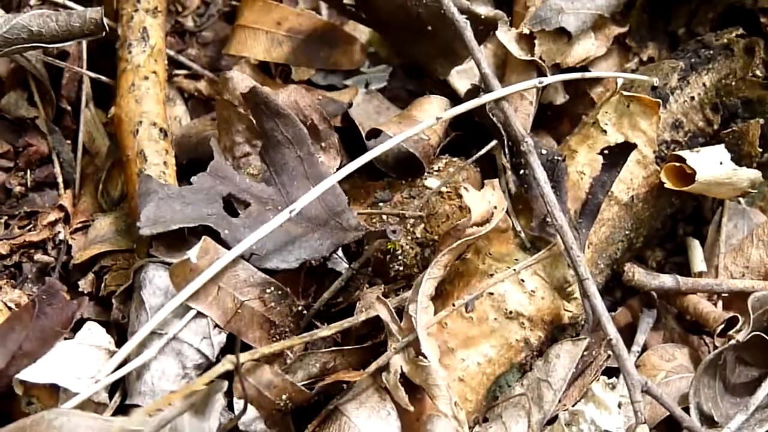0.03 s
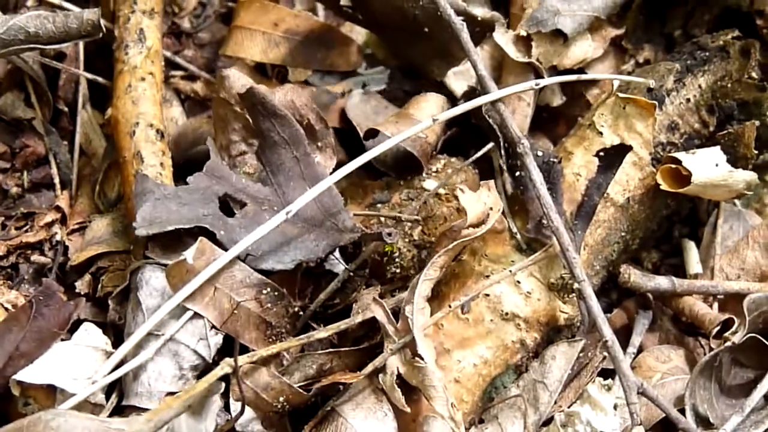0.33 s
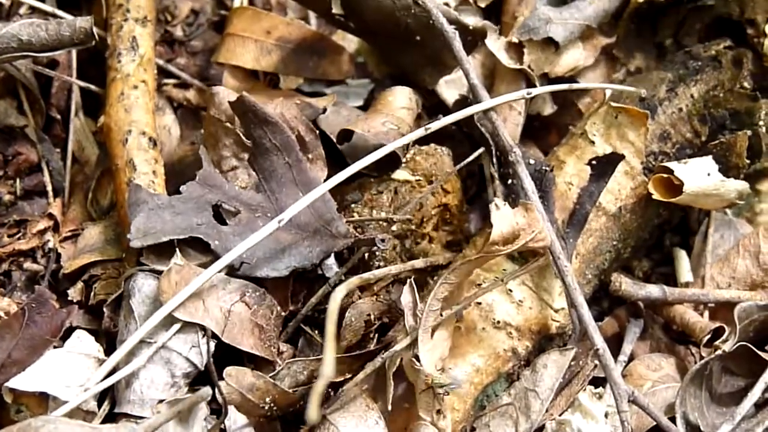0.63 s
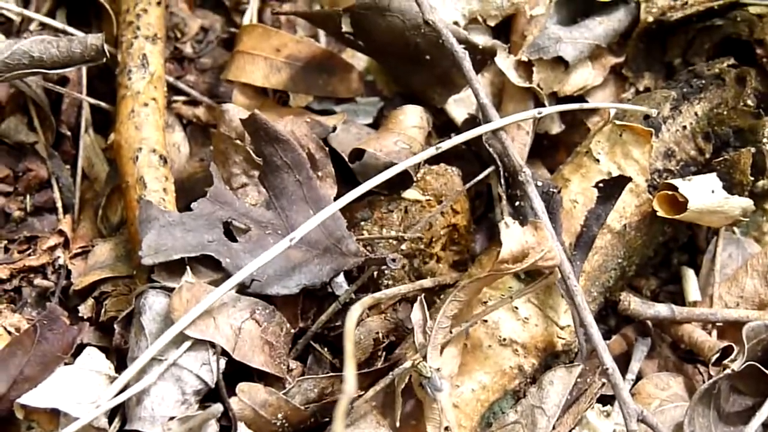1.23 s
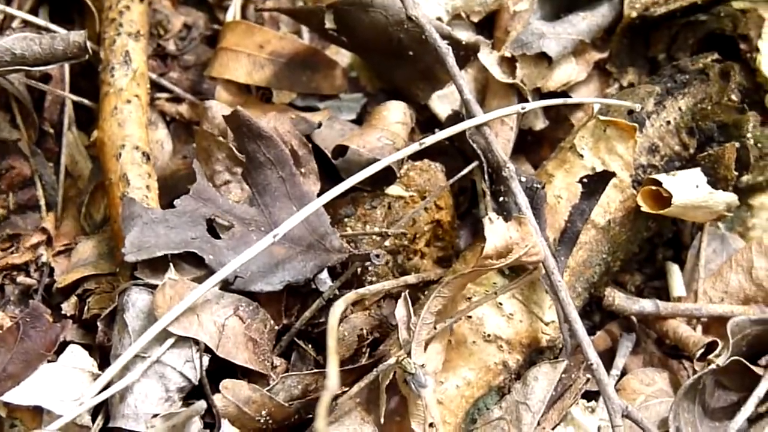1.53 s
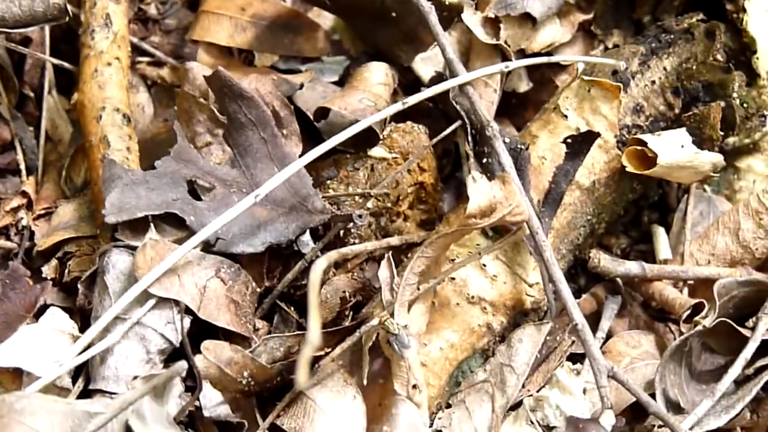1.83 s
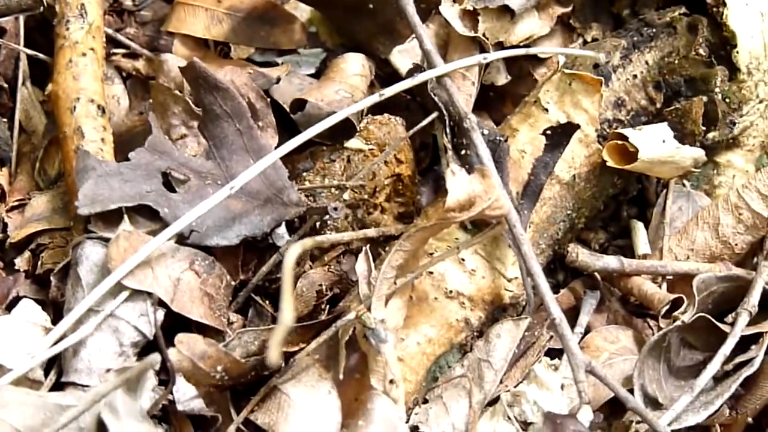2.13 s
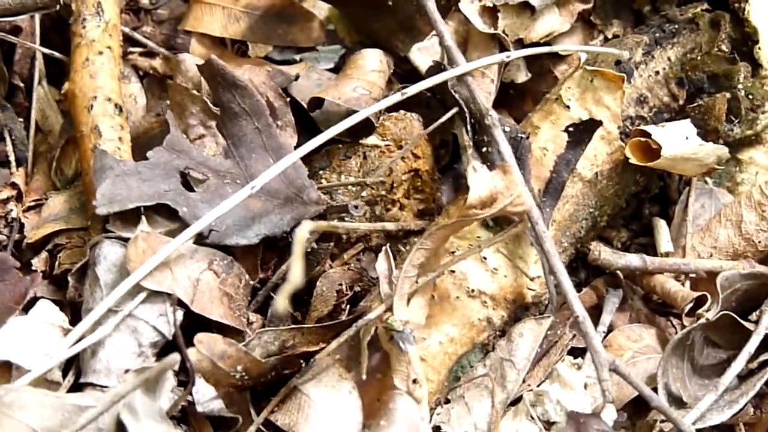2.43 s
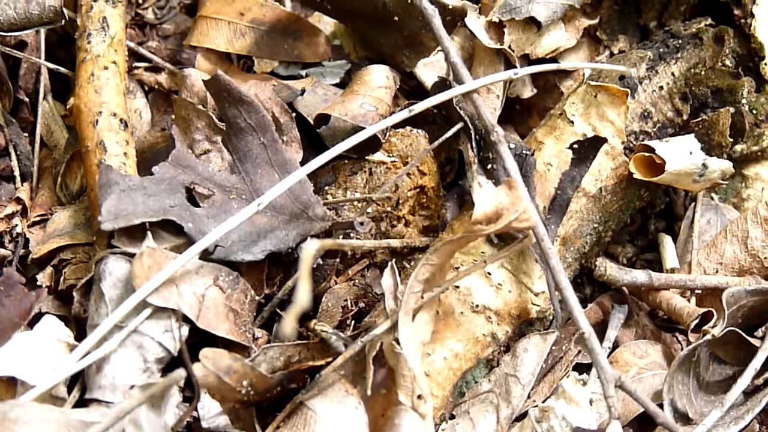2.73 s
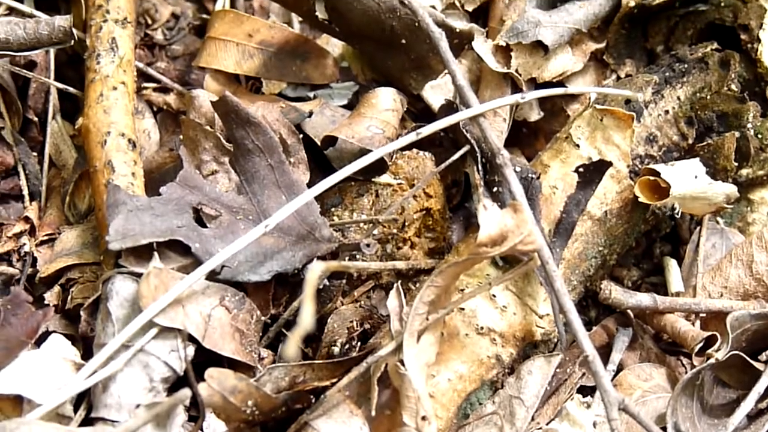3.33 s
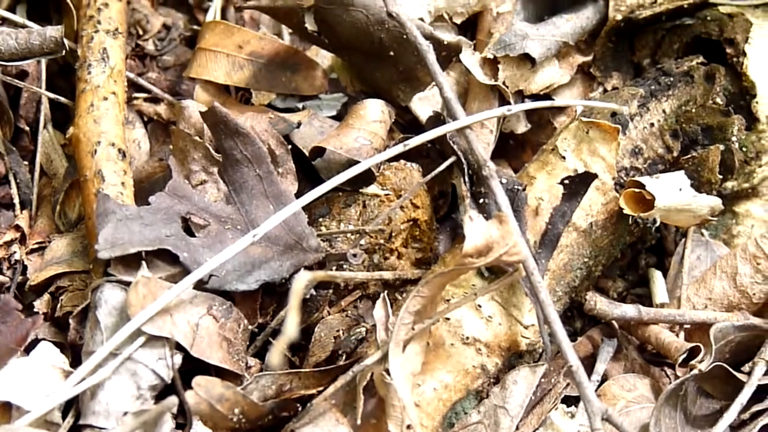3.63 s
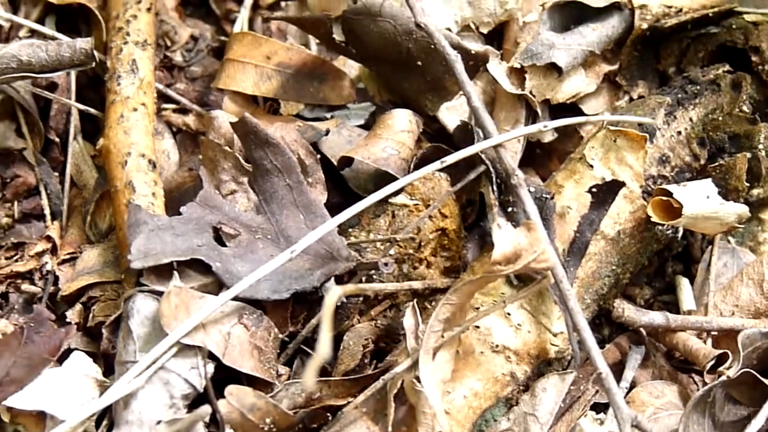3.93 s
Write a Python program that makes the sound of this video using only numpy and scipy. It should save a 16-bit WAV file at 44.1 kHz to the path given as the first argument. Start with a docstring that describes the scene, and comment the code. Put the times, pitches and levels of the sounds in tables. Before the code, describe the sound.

Cicadas sizzle in a dense, high, steady chorus, heard from the forest floor. A bird rasps at the start, others whistle faintly among the trees, dry leaves tick a few times, and one soft knock touches the microphone midway.

```python
"""A summer chorus of cicadas, heard from the forest floor: countless tymbal clicks merge into one high
sizzle, with a few nearer insects ringing through it. Birds whistle and rasp among the trees, dry leaves
tick a few times and there is one soft knock at the microphone. Far away something rumbles and hums,
with a thin whine and faint hoots. The recorder has three narrow notches and cuts the very top."""
import sys
import numpy as np
from scipy import signal
from scipy.fft import rfft, irfft
from scipy.io import wavfile

SR = 44100
rng = np.random.default_rng(int(sys.argv[2]) if len(sys.argv) > 2 else 0)


def digitize_waveform(pressure):
    """Quantize a signal to 16-bit integers and store it at the path in sys.argv[1].

    Rows of a 2-D input are taken as channels; values are limited to [-1, 1].
    """
    field = np.atleast_2d(pressure).T
    bounded = np.clip(field, -1, 1)
    quanta = np.round(bounded * 32767).astype(np.int16)
    wavfile.write(sys.argv[1], SR, quanta)


N = 176400
TIME, FREQ = np.arange(N) / SR, np.maximum(np.fft.rfftfreq(N, 1 / SR), 1)
# how alike the surrounding sound is at the left and right microphones: f/Hz, correlation
LIKENESS = [(30, 0.24), (90, 0.99), (350, 0.98), (700, 0.87), (1150, 0.53), (1800, 0.2), (3200, -0.32),
            (5500, -0.04), (6500, 0.15), (8500, -0.14), (9900, 0.016), (10300, -0.21), (11500, -0.34),
            (12500, -0.54), (14000, -0.29)]


def from_db(db):
    """Decibels to gain."""
    return 10 ** (np.asarray(db) / 20)


def rms_one(x):
    """Scale to unit power."""
    return x / np.sqrt(np.mean(x ** 2) + 1e-20)


def in_time(rows):
    """Each column of a timed table at every sample."""
    times, *columns = np.transpose(rows)
    return [np.interp(TIME, times, column) for column in columns]


def over_hz(points):
    """A table joined by straight lines in log frequency."""
    hz, value = np.transpose(points)
    return np.interp(np.log(FREQ), np.log(hz), value)


def pan(db):
    """Two gains of unit mean power, the left one db above the right."""
    return rms_one(from_db([[db / 2], [-db / 2]]))


def resonance(hz, width_hz):
    """Gain of a resonant peak at every frequency."""
    return 1 / (1 + 2 * ((FREQ - hz) / width_hz) ** 2)


def noise(gain, alike=0):
    """Stereo noise of rms 1 with a given spectrum and left-right correlation."""
    mid, side = rfft(rng.standard_normal((2, N)))
    stereo = np.sqrt(1 + alike) * mid + np.sqrt(1 - alike) * side * [[1], [-1]]
    return rms_one(irfft(gain * stereo, N))


def drift(rate_hz):
    """A random wander of rms 1, mostly slower than rate_hz."""
    return rms_one(irfft(rfft(rng.standard_normal(N)) / (1 + (FREQ / rate_hz) ** 2), N))


def swell(start, length):
    """A rounded rise and fall."""
    return np.sin(np.pi * np.clip((TIME - start) / length, 0, 1)) ** 2


def glide(start, length, start_hz, end_hz):
    """A pitch that slides evenly through a note."""
    return np.interp(TIME, [start, start + length], [start_hz, end_hz])


def tone(hz):
    """A sine of rms 1 that follows a pitch curve."""
    return np.sqrt(2) * np.sin(2 * np.pi * np.cumsum(hz) / SR)


def forest(direct, wet_db, t60_s=0.48, build_s=0.0011):
    """Direct sound plus the scatter from trunks and leaves, different at each microphone."""
    t = TIME[:SR]
    tail = rng.standard_normal((2, SR)) * from_db(-60 * t / t60_s) * (1 - np.exp(-t / build_s))
    scatter = signal.fftconvolve(np.atleast_2d(direct), rms_one(tail) / np.sqrt(SR), axes=1)[:, :N]
    return (direct + from_db(wet_db) * scatter) / np.hypot(1, from_db(wet_db))


def air(level_db=-57.5):
    """Distant rumble and the hiss of the wood, all around the microphones."""
    # spectrum of the background: f/Hz, relative level/dB
    spectrum = [(20, -40), (33, -19), (45, -13), (65, -16), (85, -5.5), (120, -0.5), (210, 0.5), (380, 1),
                (520, 4), (640, -4.5), (760, -0.5), (850, -4.5), (1000, -6.5), (1400, -7.5), (2200, -16),
                (3000, -17.5), (3700, -14.5), (4300, -19), (5200, -16.5), (5800, -18), (6600, -11),
                (7100, -18), (7500, -12), (12000, -47)]
    return from_db(level_db) * noise(from_db(over_hz(spectrum)), over_hz(LIKENESS))


def far_hum(drone_hz=291.5):
    """Something hums far off: narrow bands of noise and one slightly wavering drone."""
    # bands of the hum: f/Hz, width/Hz, level/dB
    bands = [(201.7, 17, -72), (500, 42, -74.5), (973, 69, -70.5)]
    # loudness of the drone: t/s, level/dB
    drone_levels = [(0, -70), (.6, -72.5), (1.0, -66), (1.9, -72), (2.4, -70), (3.0, -70), (4, -72)]
    alike = over_hz(LIKENESS)
    hum = sum(from_db(db) * noise(resonance(hz, width_hz), alike) for hz, width_hz, db in bands)
    drone_db, = in_time(drone_levels)
    return hum + from_db(drone_db) * tone(drone_hz + 2 * drift(6.5))


def far_whine_and_hoots(waver_share=0.02574, fade_db=1):
    """A thin whine and soft hoots carry through the trees from far off, wavering in pitch together."""
    # course of the whine: t/s, f/Hz, level/dB
    course = [(.5, 1170, -72), (.9, 1208, -74), (1.3, 1206, -72.5), (1.6, 1192, -72), (1.9, 1139, -74),
              (2.2, 1127, -69), (2.5, 1092, -80)]
    # hoots: t/s, length/s, start f/Hz, end f/Hz, level/dB
    notes = [(0.204, 0.17, 498, 503, -59), (0.591, 0.12, 470, 484, -54), (1.326, 0.1, 477, 477, -62),
             (1.478, 0.072, 490, 507, -59), (1.639, .075, 445, 507, -53), (1.63, 0.055, 970, 955, -61.5),
             (1.741, 0.15, 955, 1042, -61), (1.754, 0.087, 505, 484, -57.5), (2.025, 0.18, 965, 970, -65.5),
             (2.74, 0.075, 494, 494, -61), (2.88, 0.032, 499, 512, -53.5), (3.15, 0.065, 472, 468, -58),
             (3.496, 0.16, 475, 460, -62.5), (3.825, 0.067, 474, 470, -57), (3.9, 0.091, 487, 484, -57.5)]
    whine_hz, whine_db = in_time(course)
    waver = 1 + waver_share * drift(25.9)
    whine = from_db(whine_db + fade_db * drift(7.7)) * tone(whine_hz * waver)
    hoots = sum(from_db(db) * swell(start, length) * tone(glide(start, length, start_hz, end_hz) * waver)
                for start, length, start_hz, end_hz, db in notes)
    return forest(whine + hoots, wet_db=-12)


def bird_note(start, length, start_hz, end_hz, warble_hz):
    """One gliding whistle, roughened by a fast random warble of rms depth warble_hz."""
    hz = glide(start, length, start_hz, end_hz) + warble_hz * drift(127.3)
    return swell(start, length) * tone(hz)


def far_twitter(count, level_db=-73, note_s=0.119, low_hz=2987, high_hz=3994, slide_share=0.0713):
    """The farthest birds twitter at random, barely above the hiss and mostly as scatter."""
    notes = 0
    for k, (when, pitch, slide) in enumerate(rng.random((count, 3))):
        start = (k + when) / count * N / SR
        start_hz = low_hz + pitch * (high_hz - low_hz)
        end_hz = start_hz * (1 + slide_share * (2 * slide - 1))
        notes += bird_note(start, note_s, start_hz, end_hz, warble_hz=90)
    return from_db(level_db) * forest(notes, wet_db=10)


def leaves():
    """Dry leaves in the litter give crisp ticks and softer rustles, each a short burst of noise."""
    # bursts: t/s, level/dB, f/Hz, width/Hz, attack/s, decay/s, left over right/dB
    ticks = [(0.455, -51, 6530, 1400, .002, 0.013, 0), (.472, -56, 6000, 1400, .002, 0.0079, 0),
             (.49, -60, 5700, 1200, .005, 0.024, -5), (3.0, -61, 6800, 550, 0.039, 0.044, 0),
             (3.34, -65, 5350, 500, .02, 0.055, -4)]
    out = 0
    for start, db, hz, width_hz, attack, decay, pan_db in ticks:
        t = np.maximum(TIME - start, 0)
        envelope = np.minimum(t / attack, np.exp((attack - t) / decay))
        out += from_db(db) * pan(pan_db) * envelope * noise(resonance(hz, width_hz))
    return out


def knock(start_s=2.2275, band_hz=(260, 1400)):
    """One light, heavily damped knock at the microphone."""
    # modes of the knock: f/Hz, level/dB, t60/s
    modes = [(330, -35, 0.011), (627, -37.5, 0.0069), (970, -45, 0.0085)]
    t = np.maximum(TIME - start_s, 0)
    rings = sum(from_db(db - 60 * t / t60) * np.sin(2 * np.pi * hz * t) for hz, db, t60 in modes)
    return signal.sosfilt(signal.butter(2, band_hz, "band", fs=SR, output="sos"), rings + 1e-18)


def bird_rasp(level_db=-48, pulse_hz=96, pulse_depth=0.24):
    """One harsh call from a bird off to the right: hiss with a fast pulse."""
    # spectrum of the call: f/Hz, relative level/dB
    spectrum = [(2700, -32), (3200, -18), (3700, -16), (4300, 1), (5100, 6), (6300, 0.5), (7000, -1.5),
                (7800, -13), (9500, -36)]
    pulses = 1 + pulse_depth * np.sin(2 * np.pi * pulse_hz * TIME)
    hiss = noise(from_db(over_hz(spectrum)))
    call = from_db(level_db) * swell(start=-0.025, length=0.29) * pulses * hiss
    return pan(-7.5) * forest(call, wet_db=-4.5)


def bird_whistles():
    """Birds whistle among the trees; the farther the bird, the more the scatter smears its note."""
    # notes: t/s, length/s, start f/Hz, end f/Hz, level/dB, left over right/dB, warble/Hz, scatter/dB
    notes = [(-.04, 0.097, 3744, 3840, -53.5, 0, 120, 9), (0.028, .19, 3760, 3600, -64, 4, 70, 3),
             (0.038, 0.056, 5020, 5100, -51, -21.5, 45, -12),
             (0.154, 0.067, 5250, 4680, -47.5, -18, 30, -15), (0.736, 0.3, 3754, 3770, -58, 2, 95, 4.5),
             (2.018, 0.235, 4083, 3615, -54.5, 12, 65.4, 0), (2.01, .11, 3180, 3034, -67, 7, 99.4, 7),
             (2.151, .29, 3690, 3444, -59.5, 2.5, 80, 5), (2.161, 0.28, 6170, 5085, -60.5, 1.5, 188, 3),
             (3.404, 0.27, 3830, 3856, -57.5, 4, 120.5, 6), (3.56, .15, 5330, 5300, -67, 2, 110, 5)]
    out = 0
    for start, length, start_hz, end_hz, db, pan_db, warble_hz, wet_db in notes:
        note = from_db(db) * bird_note(start, length, start_hz, end_hz, warble_hz)
        out += pan(pan_db) * forest(note, wet_db)
    return out


def far_cicada_group(ripple_db=2, ripple_step_hz=23.73):
    """Each far cicada rings at a pitch of its own, so a group merges into a sizzle with fine peaks."""
    # spectrum of the sizzle: f/Hz, relative level/dB
    spectrum = [(7000, -53.5), (8100, -25.5), (8900, -16), (9300, -11), (9520, -8), (9930, -3.5),
                (10400, -1), (11300, -2.5), (11850, 1), (12250, 0), (12950, -6.5), (13800, -11.5),
                (15100, -24), (16000, -24)]
    ripple = np.interp(FREQ / ripple_step_hz, np.arange(SR), rng.standard_normal(SR))
    return noise(from_db(over_hz(spectrum) + ripple_db * ripple), over_hz(LIKENESS))


def cicada_chorus(groups, level_db=-39, swing_db=4, tymbal_hz=180, tymbal_depth=0.019):
    """Far groups take turns in the lead while their total stays even; the tymbals leave a faint pulse."""
    gains = [from_db(swing_db * drift(0.78)) for _ in range(groups)]
    sizzle = sum(gain * far_cicada_group() for gain in gains)
    total_gain = np.sqrt(sum(gain ** 2 for gain in gains))
    pulse = 1 + tymbal_depth * tone(tymbal_hz + 12 * drift(7.7))
    return from_db(level_db) * sizzle / total_gain * pulse


def cicadas(swing_db=1.6):
    """Nearer cicadas ring through the chorus, each in a narrow band that slowly swells and sinks."""
    # nearer insects: f/Hz, width/Hz, level/dB, left over right/dB
    insects = [(9300, 40, -66, 4), (9718, 24, -62.5, -3), (9880, 28, -59.5, 0), (9984, 22, -57.5, -5),
               (10178, 28, -60, -1), (10697, 28, -57.5, 6), (11060, 40, -60, -8), (11550, 35, -58, 0),
               (11635, 32, -59, 0), (11783, 26, -56, 3), (11895, 18, -53.5, 3), (11975, 24, -57.5, -4),
               (12173, 24, -61, 2), (12721, 16, -61, -2)]
    # slight swell of all the cicadas together: t/s, gain/dB
    swell_curve = [(0, .5), (.75, 0.8), (1.5, 0.04), (2.5, 0), (4, -0.16)]
    out = cicada_chorus(groups=4)
    for hz, width_hz, db, pan_db in insects:
        ring = noise(resonance(hz, width_hz)) * from_db(swing_db * drift(0.88))
        out += from_db(db) * pan(pan_db) * rms_one(ring)
    swell_db, = in_time(swell_curve)
    return out * from_db(swell_db)


def scene():
    """Everything that reaches the microphones on the forest floor."""
    distance = air() + far_hum() + far_whine_and_hoots() + far_twitter(count=30)
    return distance + leaves() + knock() + bird_rasp() + bird_whistles() + cicadas()


def record(dry, cutoff_hz=15200):
    """The recorder cuts steeply at the top and has three narrow notches."""
    # notches: f/Hz, width/Hz
    notches = [(2600, 292), (4640, 450), (7880, 360)]
    gain = 1 / np.sqrt(1 + (FREQ / cutoff_hz) ** 900)
    for hz, width_hz in notches:
        away = (2 * (FREQ - hz) / width_hz) ** 6
        gain *= away / (1 + away)
    return irfft(rfft(dry) * gain, N)


dry = scene()
out = record(dry)
digitize_waveform(out)
```